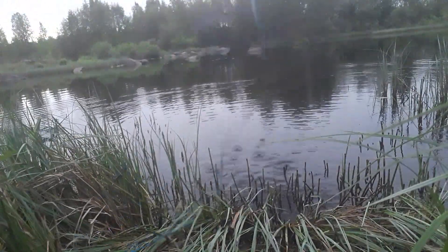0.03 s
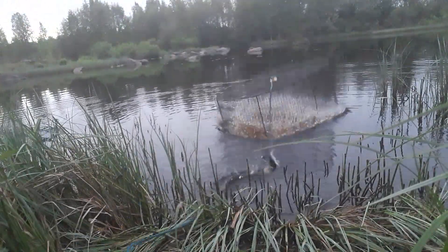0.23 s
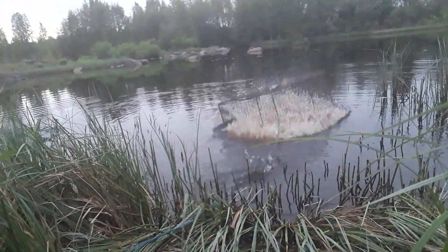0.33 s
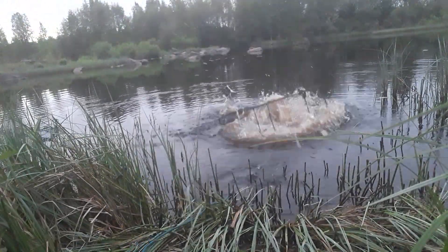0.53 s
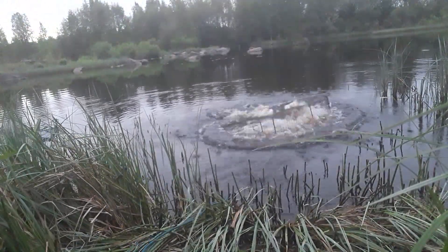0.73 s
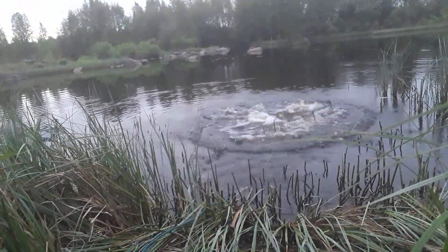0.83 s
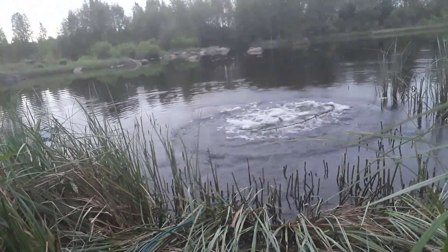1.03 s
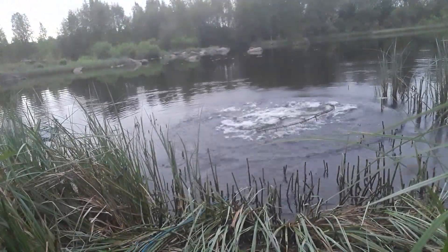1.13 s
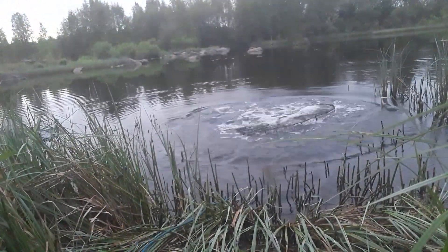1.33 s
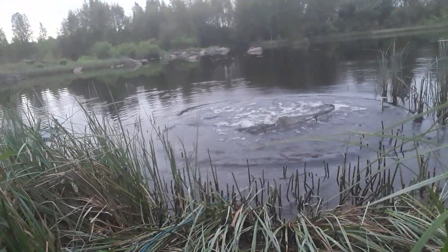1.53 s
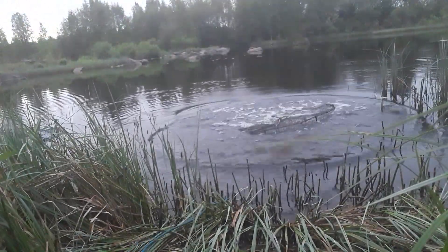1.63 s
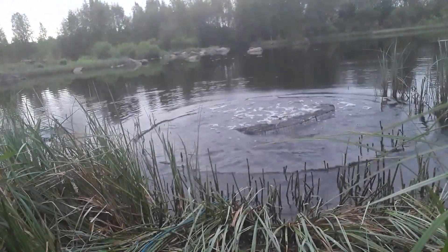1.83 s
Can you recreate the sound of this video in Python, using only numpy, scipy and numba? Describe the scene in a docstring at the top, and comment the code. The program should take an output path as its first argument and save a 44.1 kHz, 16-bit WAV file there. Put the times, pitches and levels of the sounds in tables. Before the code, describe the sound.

A wire trap splashes loudly into a calm river. Soft close knocks and a light swish come first, then the hissing slap, low gurgling bubbles, pattering drops and fading fizz, heard outdoors from the bank.

```python
"""Soft knocks close by and a light swish: a wire trap is thrown from a reedy bank into a calm river.
Its mesh cuts the surface with a hiss, the frame slaps in, and the cavity collapses into low bubbles.
The thrown water patters back, last drops plink, and foam fizzes out over a faint outdoor hiss and a
far chirp. The water is mostly bubbles, each a dying sine that rises in pitch: thousands blur into
spray and churn, single ones gulp and plink. Reeds and trees scatter back a dull tail."""
import sys
import numpy as np
from scipy import signal
from scipy.fft import rfft, irfft
from scipy.io import wavfile
from numba import njit

SR = 44100
rng = np.random.default_rng(int(sys.argv[2]) if len(sys.argv) > 2 else 0)


def materialize(psi):
    """Save the field psi as 16-bit PCM at rate SR to the path in sys.argv[1].

    A 1-D psi becomes a single channel; in a 2-D psi each row is a channel.
    """
    bounded = np.clip(np.atleast_2d(psi).T, -1, 1)
    quanta = np.round(bounded * 32767).astype(np.int16)
    wavfile.write(sys.argv[1], SR, quanta)


N = 83790
TIME = np.arange(N) / SR


def undb(db):
    """Decibels to gain."""
    return 10 ** (np.asarray(db) / 20)


def unit(x):
    """Scale to rms 1."""
    return x / np.sqrt(np.mean(x ** 2))


def colour(x, points):
    """Minimum-phase EQ through (f/Hz, gain/dB) points; the result has rms 1."""
    hz, db = np.array(points, float).T
    size = 2048
    bins = np.maximum(np.fft.rfftfreq(size, 1 / SR), 1)
    gain = undb(np.interp(np.log(bins), np.log(hz), db))
    cepstrum = irfft(np.log(gain))
    causal_fold = np.r_[1, np.full(size // 2 - 1, 2), 1, np.zeros(size // 2 - 1)]
    impulse = irfft(np.exp(rfft(cepstrum * causal_fold)))
    return unit(signal.fftconvolve(x, impulse)[:N])


def butter(x, hz, kind, order):
    """Butterworth filter."""
    return signal.sosfilt(signal.butter(order, hz, kind, fs=SR, output="sos"), x)


@njit
def low_cut(x, hz):
    """State-variable high-pass; hz is one cutoff or a sweep."""
    out, band_state, low_state = np.empty(N), 0., 0.
    damping = 1.1
    for i, g in enumerate(np.tan(np.pi * hz * np.ones(N) / SR)):
        band = (band_state + g * (x[i] - low_state)) / (1 + g * (g + damping))
        out[i] = x[i] - damping * band - low_state - g * band
        band_state, low_state = 2 * band - band_state, low_state + 2 * g * band
    return out


def envelope(start_s, attack_s, hold_s, fade_db_per_s, db):
    """Rise, hold, then fade steadily in dB."""
    fading_s = np.maximum(TIME - start_s - attack_s - hold_s, 0)
    return np.clip((TIME - start_s) / attack_s, 0, 1) * undb(db - fade_db_per_s * fading_s)


@njit
def ring(times, hz, cycles, gain, rise):
    """Sines that fall to 1/e in so many cycles while their pitch climbs by the share `rise`."""
    out = np.zeros(N)
    for k in range(len(times)):
        start, life = int(times[k] * SR), cycles[k] * SR / hz[k]
        for i in range(min(int(6 * life), N - start)):
            phase = 2 * np.pi * hz[k] / SR * i * (1 + .5 * rise * i / life)
            out[start + i] += gain[k] * np.exp(-i / life) * np.sin(phase)
    return out


def pings(rows, cycles, rise=0.):
    """One damped sine for each row that begins t/s, f/Hz, level/dB."""
    times, hz, db = np.array(rows, float).T[:3].copy()
    return ring(times, hz, np.full(len(times), float(cycles)), undb(db), rise)


def cracks(rows, decay_s=.0008):
    """A snap of noise for each row (t/s first, level/dB last)."""
    out, t = np.zeros(N), TIME[:SR // 50]
    for start_s, *_, db in rows:
        burst = undb(db) * np.exp(-t / decay_s) * rng.standard_normal(len(t))
        i = int(start_s * SR)
        out[i:i + len(t)] += burst[:N - i]
    return out


def bubble_cloud(count, low_hz, high_hz, cycles, scatter_db, rise):
    """A steady bed of bubbles, random in time, pitch, length and strength."""
    when, pitch, length, strength = rng.random((count, 4)).T
    hz = (np.sqrt(low_hz) + pitch * (np.sqrt(high_hz) - np.sqrt(low_hz))) ** 2
    accent_db = scatter_db * np.minimum(-np.log(1 - strength), 5)
    gain = undb(accent_db) * hz ** .75  # the tilt keeps the spectrum even
    return ring(when * N / SR, hz, cycles * (.5 + length), gain, rise)


# EQ of the open air: f/Hz, gain/dB
AIR_EQ = [(25, 4), (60, 6), (110, 7.5), (250, -2), (600, -3.5), (1500, -8.5), (3000, -12), (4300, -1),
          (7000, -4), (10500, 2), (13000, -5.5), (15500, -12)]
def outdoor_hiss():
    """A faint, steady bed of noise."""
    return undb(-68.5) * colour(rng.standard_normal(N), AIR_EQ)


# Syllables of the chirp: t/s, length/s, level/dB
CHIRPS = [(1.778, .04, -70.5), (1.827, 0.05, -76)]
def far_chirp(pitch_hz=3970, width_hz=220):
    """A narrow band of noise swells and fades for each syllable."""
    flutter = unit(butter(rng.standard_normal(N), width_hz / 2, "low", order=2))
    tone = flutter * np.sin(2 * np.pi * pitch_hz * TIME)
    out = np.zeros(N)
    for start_s, length_s, db in CHIRPS:
        progress = np.clip((TIME - start_s) / length_s, 0, 1)
        out += tone * undb(db) * np.sqrt(np.abs(np.sin(np.pi * progress)))
    return out


def bank_scatter(x, t60_s=.74, wet_db=-18.5):
    """Reeds and trees send back a dull, weak reverb."""
    tail = butter(rng.standard_normal(N), 3040, "low", order=1) * undb(-60 * TIME / t60_s)
    return undb(wet_db) * signal.fftconvolve(x, tail / np.linalg.norm(tail))[:N]


# EQs of the bright fizz and the midrange gurgle: f/Hz, gain/dB
FIZZ_EQ = [(300, -25), (1500, -11.5), (2400, -3.5), (3000, -6), (4500, -0.5), (7500, -6), (10500, -1.5),
           (15500, -11)]
GURGLE_EQ = [(200, -35), (450, -5), (800, -2), (1700, -0.5), (2600, -10), (5000, -32)]
def foam():
    """The white patch gurgles as it settles, and tiny bubbles burst in it."""
    fizz = bubble_cloud(20000, low_hz=596, high_hz=15060, cycles=5, scatter_db=2.3, rise=.03)
    gurgle = bubble_cloud(2500, low_hz=350, high_hz=2803, cycles=7, scatter_db=2.5, rise=.04)
    bursting = envelope(start_s=.7, attack_s=.15, hold_s=.3, fade_db_per_s=17.5, db=-65.5)
    settling = envelope(start_s=.76, attack_s=.13, hold_s=.08, fade_db_per_s=86, db=-66.5)
    return colour(fizz, FIZZ_EQ) * bursting + colour(gurgle, GURGLE_EQ) * settling


# Soft knocks as the trap is let go: t/s, level/dB
KNOCKS = [(0.0492, -30.5), (0.052, -42), (0.0546, -33.5), (0.0633, -43), (0.0697, -39.5), (0.072, -46)]
# EQ of the swish: f/Hz, gain/dB
SWISH_EQ = [(300, -15), (1200, -4), (2800, -13), (4300, -1.5), (7000, -4), (10500, 0.5), (15500, -4.5)]
def throw(knock_hz=970):
    """Dull knocks and a light swish as the trap flies out."""
    knocks = pings([(start_s, knock_hz, db) for start_s, db in KNOCKS], cycles=.7)
    flight = envelope(start_s=.04, attack_s=.02, hold_s=.02, fade_db_per_s=45, db=-61)
    swish = colour(rng.standard_normal(N), SWISH_EQ) * flight
    return swish - butter(knocks, 2200, "low", order=6)


# A small sharp tick during the throw (two rows), then drops after the splash: t/s, f/Hz, level/dB
TICK_AND_DROPS = [(0.132, 3600, -53), (0.1324, 10500, -43), (0.669, 5350, -31), (0.682, 9990, -31),
                  (0.771, 9500, -30), (0.776, 7360, -35), (0.7935, 2420, -29.5), (0.7941, 3900, -28.5),
                  (0.8158, 4570, -34), (0.827, 9200, -37.5), (0.8385, 10200, -37.5), (0.8915, 5230, -35.5),
                  (0.9225, 4980, -43.5), (0.9262, 7500, -37.5), (0.9615, 2370, -46), (0.9628, 4700, -39),
                  (0.9642, 6870, -35), (1.0085, 7000, -47), (1.538, 5600, -49), (1.571, 6520, -54.5)]
def tick_and_drops():
    """A tick in the throw, then single drops landing; each is a snap of noise with a short high ring."""
    snaps = butter(cracks(TICK_AND_DROPS), (2200, 11500), "band", order=2)
    plinks = low_cut(pings(TICK_AND_DROPS, cycles=3.8, rise=.04), 1200)
    return plinks + undb(-5.5) * snaps


# EQ of the falling water: f/Hz, gain/dB
PATTER_EQ = [(60, -46), (130, -17), (270, -10.5), (450, -1), (900, -.5), (1600, -2.5), (2900, -11),
             (4300, -8), (7000, -14.5), (11000, -14), (15500, -22)]
def falling_water():
    """Thrown water patters back in a shower of short-lived bubbles."""
    patter = bubble_cloud(24000, low_hz=111.2, high_hz=14900, cycles=2.78, scatter_db=2.5, rise=.043)
    shower = envelope(start_s=.4447, attack_s=.11, hold_s=.1522, fade_db_per_s=79.5, db=-38)
    return colour(patter, PATTER_EQ) * shower


# EQ of the spray: f/Hz, gain/dB
SPRAY_EQ = [(200, -18), (900, -2), (1800, -1), (2900, -2), (4300, 3.5), (7000, -1.5), (11000, -0.35),
            (15500, -5.5)]
def mesh_spray(contact_s=.1752, sweep_s=.009):
    """The mesh tears the surface into a hiss whose lower edge sinks as the wire bites deeper."""
    mist = bubble_cloud(45000, low_hz=298, high_hz=15500, cycles=2.5, scatter_db=2, rise=.02)
    edge_hz = 760 + 8000 * np.exp(-np.maximum(TIME - contact_s, 0) / sweep_s)
    burst = envelope(contact_s, attack_s=.0015, hold_s=.18, fade_db_per_s=83, db=-35)
    return low_cut(colour(mist, SPRAY_EQ), edge_hz) * burst


# Frame and body hitting the water: t/s, f/Hz, thud level/dB, crack level/dB
SLAPS = [(0.2226, 633, -18, -21), (0.2655, 700, -20.5, -38.5), (0.2695, 860, -13.5, -34),
         (0.2704, 1684, -14, -26), (0.2712, 3200, -13.5, -31.5), (0.2795, 1000, -16, -35.5),
         (0.282, 1300, -14.5, -34)]
def frame_slap(sizzle_s=.02):
    """Each hit is a thud with a crack on top; the first throws up a sizzling sheet of water."""
    since_hit = TIME - SLAPS[0][0]
    sheet = undb(-34) * (since_hit > 0) * np.exp(-np.abs(since_hit) / sizzle_s)
    sizzle = low_cut(rng.standard_normal(N), 6000) * sheet
    hits = pings(SLAPS, cycles=1.2) + cracks(SLAPS)
    return sizzle + low_cut(hits, 230)


# Fader ride of the churn in the collapsing cavity: t/s, level/dB
CHURN_FADER = [(0.212, -75.5), (0.221, -54), (0.225, -33), (0.262, -34.5), (0.272, -23.5), (0.345, -23.5),
               (0.385, -29), (0.49, -36.5), (0.62, -43), (0.75, -56), (1.0, -83)]
# EQ of the churn: f/Hz, gain/dB
CHURN_EQ = [(40, -44), (70, -26), (120, -4), (250, -5), (400, 0), (800, .5), (1200, -6), (1900, -11),
            (2800, -17), (4000, -15.5), (7000, -29.5), (15000, -42.5)]
# Large air pockets ringing: t/s, f/Hz, level/dB
GULPS = [(0.198, 1024, -30.5), (0.211, 755, -34.5), (0.232, 474, -28), (0.306, 332, -19), (0.309, 836, -25),
         (0.3305, 410, -13.5), (0.3335, 417, -17.5), (0.342, 890, -20), (0.349, 700, -20),
         (0.379, 378, -21), (0.398, 770, -26.5), (0.412, 432, -27), (0.433, 855, -29), (0.452, 620, -22),
         (0.507, 474, -28.5), (0.551, 563, -25.5), (0.568, 410, -28), (0.608, 639, -26.5),
         (0.628, 562, -29), (0.78, 430, -38.5), (0.876, 920, -37.5), (1.43, 830, -65.5)]
def cavity_collapse():
    """The hole in the water closes and breaks into bubbles, a few of them large."""
    churn = bubble_cloud(14000, low_hz=80.03, high_hz=9940, cycles=4, scatter_db=2, rise=.04)
    churn_db = np.interp(TIME, *np.array(CHURN_FADER).T)
    gulps = low_cut(pings(GULPS, cycles=3.88, rise=.025), 263)
    return colour(churn, CHURN_EQ) * undb(churn_db) + gulps


def scene():
    """The throw and the splash out on the river, heard in mono from the bank."""
    action = throw() + mesh_spray() + frame_slap() + cavity_collapse()
    action += falling_water() + tick_and_drops() + foam()
    return (action + bank_scatter(action) + outdoor_hiss() + far_chirp())[None]


def record(dry, bottom_hz=75, top_hz=16100):
    """Thin the deep bass and cut the very top steeply."""
    thinned = butter(dry, bottom_hz, "high", order=4)
    return signal.sosfilt(signal.ellip(10, .2, 70, top_hz, fs=SR, output="sos"), thinned)


dry = scene()
out = record(dry)
materialize(out)
```